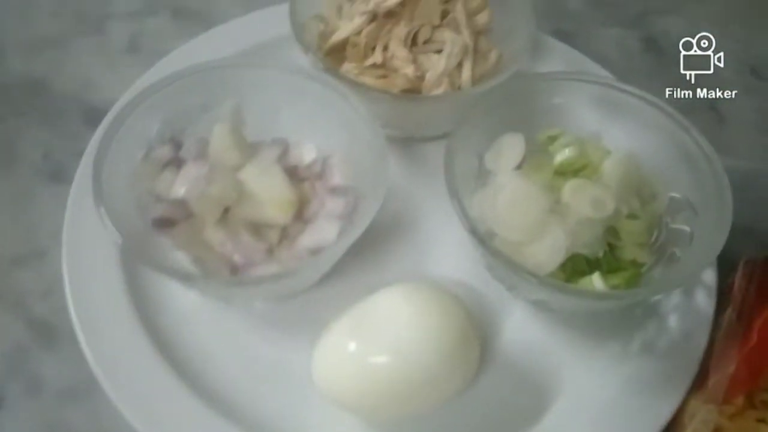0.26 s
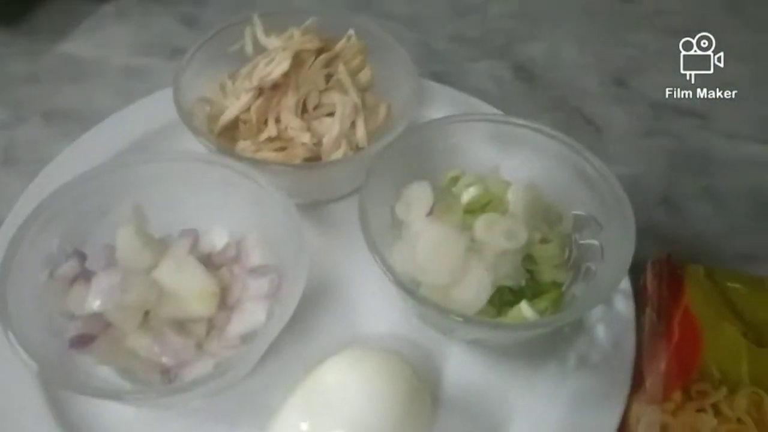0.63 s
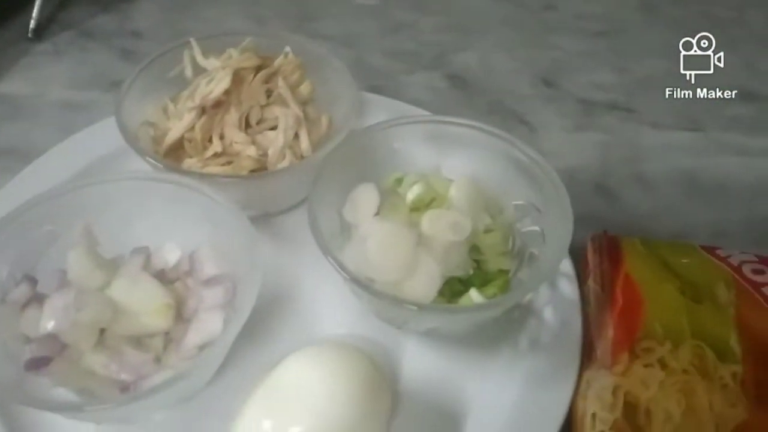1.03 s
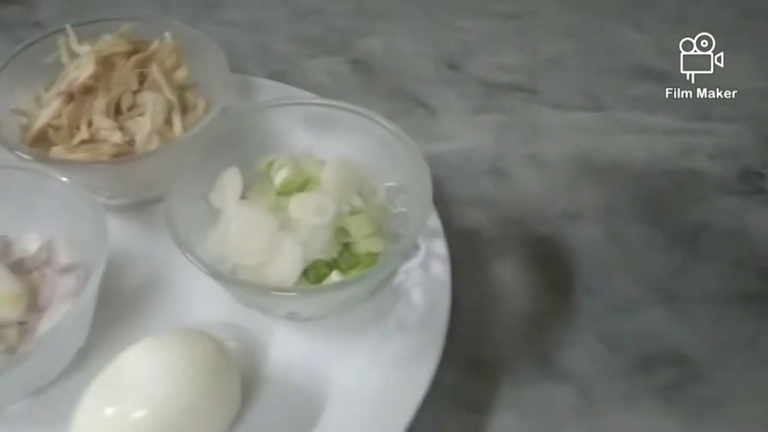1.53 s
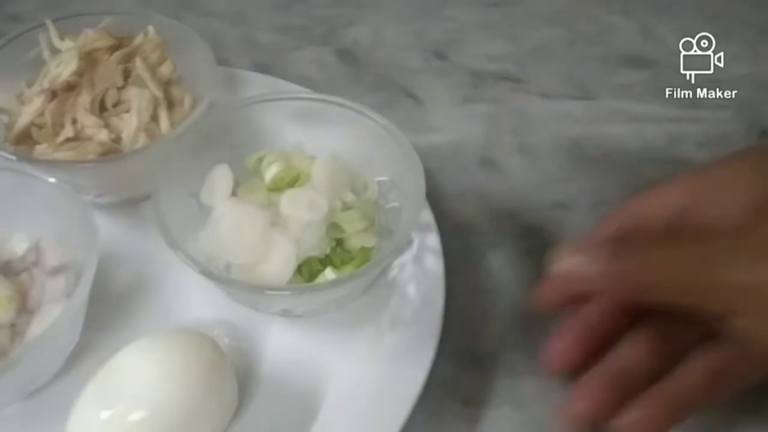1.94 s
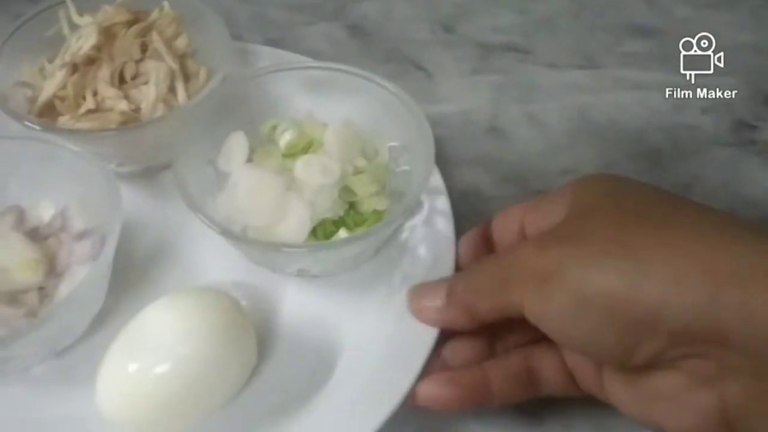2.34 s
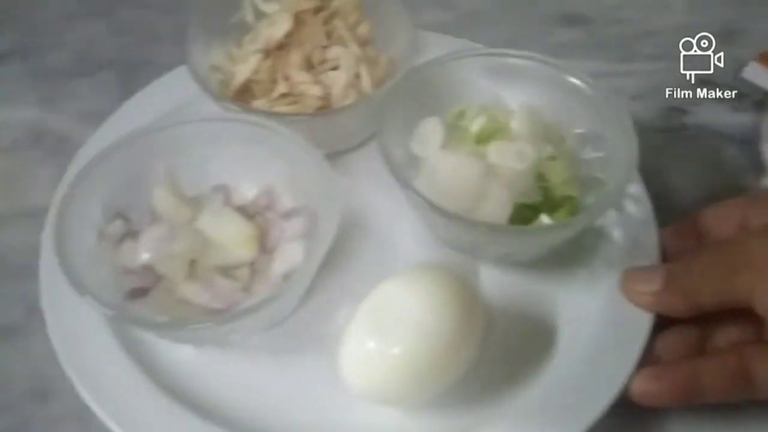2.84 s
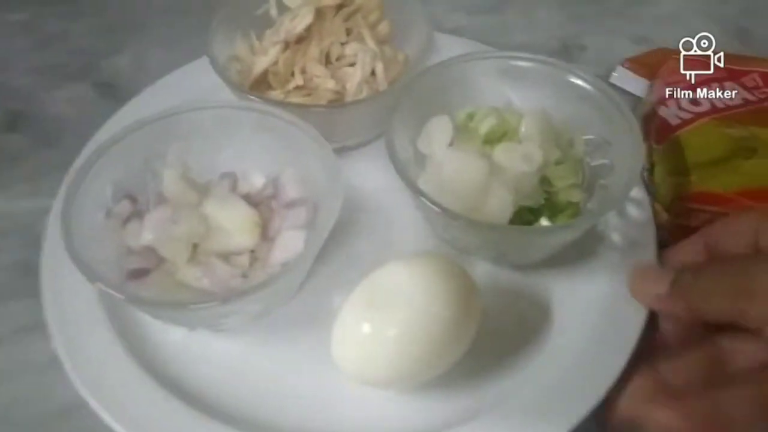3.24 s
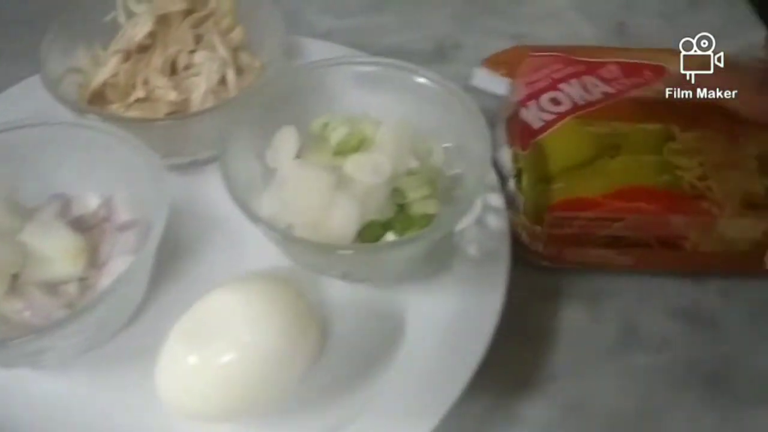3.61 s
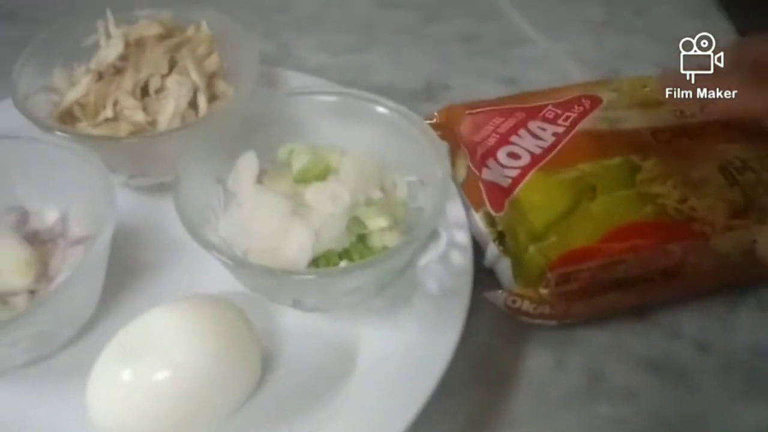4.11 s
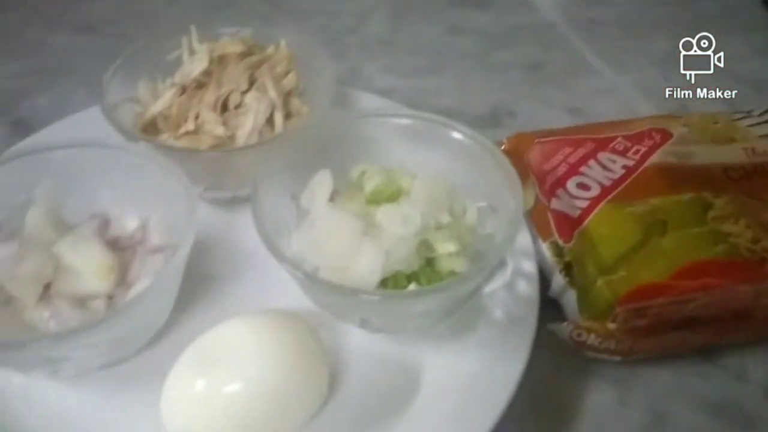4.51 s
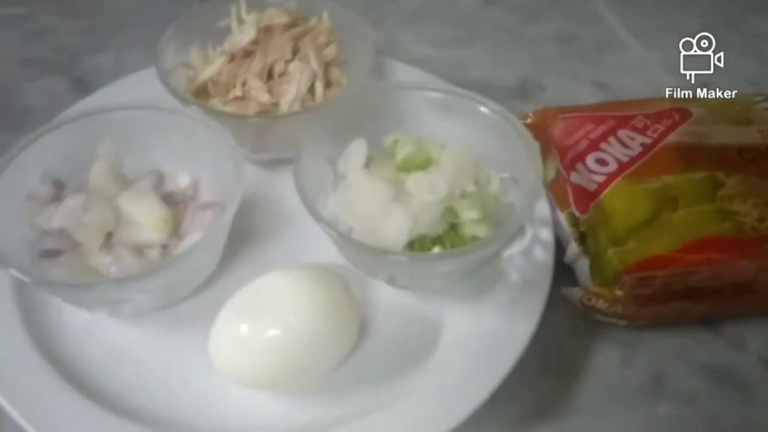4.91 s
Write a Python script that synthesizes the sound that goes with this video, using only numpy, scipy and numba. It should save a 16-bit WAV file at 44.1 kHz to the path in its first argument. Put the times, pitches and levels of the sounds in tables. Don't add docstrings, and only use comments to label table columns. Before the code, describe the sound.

In a hard-walled kitchen with a low fan hum, a plastic packet of dry noodles rustles and snaps, first briefly, then densely as it is lifted away. After a lull, a china plate slides across the stone counter with a ringing scrape. The packet returns with sharp crinkles, dull knocks and little buzzing jerks. A close phone microphone catches it all, with faint gas hiss at the end.

```python
import sys
import numpy as np
from scipy import signal
from scipy.fft import rfft, irfft
from scipy.io import wavfile
from scipy.ndimage import uniform_filter1d
from numba import njit

SR = 44100
rng = np.random.default_rng(int(sys.argv[2]) if len(sys.argv) > 2 else 0)


def dump(signal):
    limited = np.clip(np.atleast_2d(signal).T, -1, 1)
    pcm = np.round(limited * 32767).astype(np.int16)
    wavfile.write(sys.argv[1], SR, pcm)


def volts_from_db(level):
    exponent = np.asarray(level, float) / 20
    return 10 ** exponent


N = 227732


def level(x, db):
    return x * volts_from_db(db) / np.sqrt(np.mean(x ** 2))


def band(x, lo_hz, hi_hz, order=2):
    return signal.sosfilt(signal.butter(order, [lo_hz, min(hi_hz, .45 * SR)], "band", fs=SR, output="sos"), x)


def high_pass(x, hz):
    return signal.sosfilt(signal.butter(3, hz, "high", fs=SR, output="sos"), x)


def colour(x, table):
    hz, db = np.transpose(table)
    f = np.maximum(np.arange(N // 2 + 1) * SR / N, 1)
    return irfft(rfft(x) * volts_from_db(np.interp(np.log(f), np.log(hz), db)), N)


def ring(x, modes):
    out = 0
    for k, (f, width, db) in enumerate(modes):
        mode = signal.lfilter(*signal.iirpeak(f, f / max(width, 2), fs=SR), x)
        out = out + (-1) ** k * volts_from_db(db) * mode
    return out


def gains(spans):
    t, out = np.arange(N) / SR, 0
    for rows in spans:
        s, *cols = np.transpose(rows)
        fade = np.clip(np.minimum(t - s[0], s[-1] - t) / .02 + (s[0] <= 0), 0, 1)
        out = out + fade * volts_from_db(np.array([np.interp(t, s, c) for c in cols]))
    return out


def walk(rate):
    k = int(SR / rate)
    held = np.repeat(rng.standard_normal(N // k + 1), k)
    return 1.3 * uniform_filter1d(uniform_filter1d(held, k), k)[:N]


def crackle(rate, spread_db):
    hit, size, sign = rng.random((3, N))
    return (hit < rate / SR) * volts_from_db(-spread_db * np.log(size + .01)) * np.sign(sign - .5)


def fading(hits, tau_s):
    return signal.lfilter([1], [1, -np.exp(-1 / (tau_s * SR))], hits) * rng.standard_normal(N)


@njit
def grains(start, hz, t60, rise, size):
    out = np.zeros(N)
    for k in range(len(hz)):
        p, z = np.exp(2j * np.pi * hz[k] / SR - np.log(1000) / (t60 * SR)), size[k] + 0j
        for i in range(min(N - start[k], int(t60 * SR))):
            z *= p
            out[start[k] + i] += z.imag * (1 - np.exp(-i / (rise * SR)))
    return out


def hums(lines):
    out = 0
    for f, width, db in lines:
        once = ring(rng.standard_normal(N), [(f, width, 0)])
        twice = ring(once, [(f, width * 2, 0)])
        out = out + level(twice, db) * volts_from_db(1.45 * walk(2.05))
    return out


# frequency in Hz, density in dB per Hz.
FAN_AIR = [(18, -44), (30, -16.5), (194, -16.5), (221, -18.5), (287, -14), (473, -14.5), (526, -14),
           (684, -18), (1430, -22), (2480, -30.5), (7090, -37.5), (9220, -48), (16000, -46.5)]
# frequency in Hz, width in Hz, level in dB.
FAN_HUM = [(96.4, 10.6, -57.5), (193.7, 5.4, -59), (144.2, 14, -61.5), (333.6, 29, -63.5),
           (118.8, 13.3, -59), (282.2, 14, -68)]
# frequency in Hz, width in Hz, level in dB.
FLAME_WHISTLE = [(9150, 250, -75.5), (12200, 120, -89), (11760, 100, -82), (4960, 270, -81.5),
                 (10800, 870, -78.5)]
# time in seconds, level in dB.
FLAME_SWELL = [
    (0, -3),
    (.9, 0),
    (2.1, -3.5),
    (3.5, 2),
    (4.4, 1),
    (4.7, 3.5),
    (5.2, 5.5),
]


def kitchen():
    air = level(colour(rng.standard_normal(N), FAN_AIR), -52) * volts_from_db(0.22 * walk(2.2))
    return air + hums(FAN_HUM) + gains([FLAME_SWELL])[0] * hums(FLAME_WHISTLE)


# frequency in Hz, density in dB per Hz.
FILM_TONE = [(150, 17), (250, 6), (700, -1), (1300, 1.5), (2500, 7.5), (5000, 14), (7800, 1), (9900, 0.5),
             (11500, -1.5), (13000, -14), (16000, -6.5)]
# time in seconds, crumpling in dB, tautness in dB (taut is brighter).
GRIP_ON_FILM = [
    [(0.0, -42.5, 1.5), (0.098, -60.5, -4), (0.11, -51, 13), (0.22, -53.5, -6), (0.3, -55.5, -6),
     (0.45, -67.5, 0), (0.68, -65, -1), (0.87, -52.5, 0), (0.96, -56, 0)],
    [(0.94, -48, -5), (1.0, -43, -1), (1.2, -39.5, -3.5), (1.35, -38.5, 4.5), (1.47, -37.5, 6),
     (1.58, -38, 8.5), (1.73, -43, -4), (1.9, -57.5, -12), (2.25, -74, -17.5)],
    [(3.636, -54, -8), (3.665, -30.5, 2.5), (3.7, -39.5, 0), (3.78, -36, -0.5), (3.92, -49, 5),
     (4.06, -43.5, -5), (4.19, -46, 2.5), (4.28, -54, -6.5), (4.45, -51, -6)],
]


def rustle():
    film = colour(crackle(4200, 3.6) * volts_from_db(1.6 * walk(35)), FILM_TONE)
    grip = [[(s, db - taut + 1.5, db + 3, db + taut - 4.5) for s, db, taut in rows] for rows in GRIP_ON_FILM]
    out = 0
    for gain, (lo_hz, hi_hz) in zip(gains(grip), [(250, 2500), (2500, 7000), (7000, 16500)]):
        flicker = volts_from_db(1.8 * walk(60))
        out = out + gain * flicker * level(band(film, lo_hz, hi_hz, order=3), -4)
    return out


# time in
# seconds, # dull ring in dB, low patch in Hz, crack in dB, high patch in Hz.
CREASES = [(0.1046, -24, 2300, -16.5, 6200), (0.1097, -38, 1360, -48, 3930),
           (0.2332, -35.5, 1050, -52, 3640), (0.259, -34, 2400, -47, 3610),
           (0.278, -25.5, 1470, -45, 4050), (0.3014, -25.5, 1440, -37.5, 4070),
           (0.408, -53, 1670, -48.5, 4010), (0.5026, -58, 1780, -49, 3610),
           (0.558, -29, 1680, -31, 7300), (0.5623, -21.5, 1910, -34, 9900),
           (0.5647, -26, 2070, -56, 10140),
           (0.9501, -27.5, 1380, -28, 9550), (0.988, -28, 2140, -32, 3610),
                (1.01, -28, 3020, -34, 4120), (1.017, -29, 2040, -27.5, 10400),
                (1.0212, -32, 1430, -27, 4400), (1.0561, -30, 1370, -14, 10400),
                (1.071, -25, 1570, -27, 9700), (1.083, -45, 1500, -36, 9160),
                (1.1201, -24.5, 1120, -18.5, 5200), (1.125, -31, 1410, -28, 10200),
                (1.1319, -23.5, 1340, -29, 4680), (1.1566, -22, 1400, -19, 10000),
                (1.1617, -23, 1380, -20, 10100), (1.1735, -32, 1300, -17.5, 4900),
                (1.1893, -20.5, 1500, -33, 5220), (1.237, -29, 1520, -32, 3920),
                (1.249, -33, 2000, -24, 6560), (1.2627, -33, 1360, -25, 9800),
                (1.2693, -28, 1480, -16.5, 9900), (1.2774, -27, 1500, -21, 3540),
                (1.2921, -27, 1600, -13, 4170), (1.301, -30, 1390, -41, 4150), (1.313, -27, 900, -40, 4480),
                (1.3581, -23, 2050, -16.5, 5240),
           (1.4252, -40, 2010, -31, 9920), (1.476, -34, 3100, -31, 4510),
                 (1.5044, -32, 1120, -28.5, 9700), (1.544, -38, 3110, -28, 4550),
                 (1.59, -37, 2840, -32, 10000), (1.667, -28.5, 980, -26, 2620),
                 (1.709, -29, 1900, -34, 5380), (1.738, -26, 1250, -39, 3840),
                 (1.7428, -26, 1310, -31.5, 3580), (1.76, -19, 2390, -29, 3910),
                 (1.771, -21.5, 2270, -24.5, 4930), (1.774, -37, 2330, -37, 10600),
                 (1.8162, -36, 1480, -31, 6950), (1.851, -43, 2470, -40, 7500),
                 (1.891, -41, 1500, -36, 5500), (1.9573, -33, 1080, -51.5, 3640),
                 (2.355, -43, 2020, -51, 5570), (2.392, -56, 1100, -67, 3710),
                 (2.4, -34.5, 2230, -60, 4810), (2.408, -39, 1430, -62, 4690),
                 (3.168, -25, 1910, -25, 3900),
           (3.6546, -28, 1180, -27, 4060), (3.668, -26, 1100, -25, 4200),
                    (3.6723, -29, 3000, -19, 4650), (3.722, -28, 2030, -32, 4550),
                    (3.73, -33, 2100, -24, 10400), (3.7345, -27, 1300, -25, 4050),
                    (3.7559, -25, 1240, -21.5, 10100), (3.7756, -23, 1890, -35, 4220),
                    (3.7817, -26, 1950, -20, 3950), (3.814, -41, 1800, -35, 4220),
                    (3.8281, -29, 1430, -35, 9500), (3.852, -50, 1930, -36, 8000),
                    (3.882, -40, 1130, -36, 4030), (3.8901, -20, 1890, -24, 3480),
                    (3.954, -37, 2720, -43, 3610), (3.966, -29, 1940, -46, 3630),
                    (3.9857, -22, 1280, -44, 5770), (4.034, -33, 1980, -45, 5240),
                    (4.0689, -28, 1310, -31, 3610), (4.0823, -17, 1290, -16, 4050),
                    (4.186, -38, 1850, -33, 9280), (4.2657, -34, 1900, -41, 4260),
                    (4.2846, -35, 1210, -32, 3920), (4.4932, -47, 2700, -57, 4310),
           (0.117, -31, 1390, -42, 2400), (0.129, -41, 1360, -50, 3600),
                 (0.9527, -29.5, 1100, -28.5, 7100), (0.973, -47, 1500, -34, 5000),
                 (0.992, -27, 1190, -42, 3600), (0.999, -31, 1250, -44, 3600),
                 (1.0265, -27, 1250, -27, 8000), (1.047, -44, 1250, -36, 3600),
                 (1.064, -38, 1300, -40, 4000), (1.068, -25, 1390, -35, 4000),
                 (1.082, -37, 1300, -29, 3600), (1.091, -41, 1300, -38, 3600),
                 (1.0995, -30, 1500, -36, 3600), (1.141, -38, 1420, -44, 3600),
                 (1.167, -25, 1600, -34, 4000), (1.193, -35, 1300, -31, 3600), (1.21, -28, 1700, -35, 3500),
                 (1.214, -30, 1210, -28, 5000), (1.229, -32, 1300, -34, 3600),
                 (1.242, -36, 1360, -41, 3600), (1.257, -24, 2100, -29, 4500),
                 (1.273, -37, 1150, -41, 3600), (1.2942, -16, 2800, -26, 3500),
                 (1.307, -27, 2930, -26, 3600), (1.367, -30, 2020, -39, 3570), (1.398, -28, 990, -39, 3600),
                 (3.727, -29, 1290, -24, 4000), (3.768, -28, 1300, -31, 3600),
                 (3.934, -30, 1290, -36, 3600), (3.973, -37, 2600, -40, 4200), (4.043, -35, 990, -46, 3600),
                 (4.06, -29, 1560, -38, 3600), (4.0887, -31, 1900, -31, 4200),
                 (4.094, -28, 1700, -44, 3600), (4.105, -33, 2700, -45, 3600),
                 (4.172, -30, 1850, -46, 3600)]
# t60 in seconds, spread in octaves, boost in dB, rise in seconds.
FILM_PATCHES = [
    (0.013, 0.11, 5.5, 0.000054),
    (0.0034, 0.23, 7, 0.000029),
]


def snaps():
    creases = CREASES
    s, dull_db, low_hz, bright_db, high_hz = np.array(creases).T[:, :, None]
    crack = np.zeros(N)
    crack[(s[:, 0] * SR).astype(int)] = volts_from_db(bright_db[:, 0] + 11)
    tear = volts_from_db(-6) * fading(crack, .0012) + volts_from_db(-16) * fading(crack, .009)
    out = band(volts_from_db(-2) * np.diff(crack, prepend=0) + tear, 770, 6630)
    count, scatter_s, follow_db = 4, .0008, -3
    order = np.arange(count)
    patches = (low_hz, dull_db - 5), (high_hz, bright_db - 2)
    for (centre_hz, db), (t60, octaves, boost_db, rise) in zip(patches, FILM_PATCHES):
        detune, lag = rng.uniform(-1, 1, (2, len(s), count))
        hz = np.minimum(centre_hz * 2 ** (octaves * detune * order), .27 * SR)
        start = ((s + scatter_s * abs(lag) * order) * SR).astype(np.int64)
        size = volts_from_db(db + boost_db + follow_db * order)
        out = out + grains(start.ravel(), hz.ravel(), t60, rise, size.ravel())
    return high_pass(out, 700)


# time
# in seconds, level in dB, frequency in Hz.
SHARP_POPS = [(0.1047, -3.5, 2920), (0.952, -29, 5030), (0.9882, -25, 3000), (1.0558, 0.6, 7400),
              (1.176, -16, 4950), (1.189, -8, 2560), (1.2928, -10, 4270), (1.358, -4.5, 3000),
              (2.9375, -15, 2400), (2.858, -24, 7000), (1.2497, -20, 2400), (1.1567, -16, 2600),
              (3.655, -23, 4500), (3.671, -13, 5000), (3.889, -21, 3000), (4.0826, -9, 3600),
              (4.265, -33, 2600)]


def pops():
    s, db, hz = np.transpose(SHARP_POPS)
    cycles = grains((s * SR).astype(np.int64), hz, .0017, 1 / SR, volts_from_db(db + 2))
    return band(cycles, 1640, 17300)


# time in seconds, level in dB, frequency in Hz.
BLOCK_KNOCKS = [(0.279, -59, 500), (1.004, -37, 350), (1.027, -40, 470), (1.187, -37, 700),
                (1.27, -34.5, 425), (1.297, -34, 495), (1.357, -54, 453), (2.31, -47, 350),
                (2.398, -39, 430), (2.405, -49, 477), (2.44, -46, 400), (3.653, -46, 320), (3.67, -38, 605),
                (3.734, -34.5, 730), (3.78, -39.5, 477), (3.893, -34.5, 784), (3.9, -43, 338),
                (3.951, -36.5, 610), (4.082, -37, 490), (4.103, -45, 800), (4.285, -46, 506)]


def knocks():
    s, db, hz = np.transpose(BLOCK_KNOCKS)
    t60_s, rise_s = .013, .00049
    return grains((s * SR).astype(np.int64), hz, t60_s, rise_s, volts_from_db(db + 9.5))


# time in #
# seconds, level in dB, frequency in Hz.
SLACK_FOLDS = [(0.3044, -33, 1210), (1.0857, -27, 1400), (1.139, -26, 1500), (1.2787, -14, 2000),
               (1.4104, -33, 2410), (1.481, -28, 1450), (1.494, -31, 2500), (1.518, -29, 1060),
               (1.5387, -37, 2500), (1.593, -33, 2500), (1.7017, -31, 1010), (1.72, -34, 1950),
               (1.7431, -30, 1360), (1.7524, -32, 5500), (1.757, -33, 5000), (1.826, -33, 2530),
               (2.4066, -40, 1380), (3.648, -34, 1230), (3.667, -26, 1600), (3.6701, -20, 1300),
               (3.6796, -33, 2000), (3.7638, -27, 1090), (3.7713, -25, 1950), (3.923, -30, 1220),
               (3.9869, -17, 1270), (3.992, -26, 2120), (4.0155, -32, 2060), (4.032, -25, 1990),
               (4.16, -29, 1820), (4.198, -32, 2180), (4.383, -33, 2010), (4.4293, -32, 1950),
               (4.433, -27, 1850), (1.6367, -33, 5000)]


def gives():
    s, db, hz = np.transpose(SLACK_FOLDS)
    t60_s, rise_s = .007, .00028
    return grains((s * SR).astype(np.int64), hz, t60_s, rise_s, volts_from_db(db + 2))


# frequency in Hz, width in Hz, level in dB.
AIR_POCKET = [(1390, 200, 5), (1500, 300, -11)]
# time in seconds, level in dB.
HAND_SQUEEZE = [
    (0.945, -39),
    (0.985, -48),
    (1.0, -34),
    (1.05, -46),
    (1.058, -33),
    (1.098, -40.5),
    (1.11, -54),
    (1.2, -45),
    (1.3, -38.5),
    (1.4, -49),
]


def pouch():
    return gains([HAND_SQUEEZE])[0] * level(ring(crackle(900, 3), AIR_POCKET), 0)


def stone_grit():
    return crackle(5000, 2.5) * volts_from_db(walk(50))


# time in seconds, level in dB.
LAY_ASIDE = [
    (1.8, -38),
    (1.9, -37),
    (2.2, -63),
]
# frequency in Hz, width in Hz, level in dB.
RESTING_PLACE = [(2390, 160, 0), (2600, 200, -4), (3050, 400, -4), (3670, 150, -9)]


def settle():
    return gains([LAY_ASIDE])[0] * level(ring(stone_grit(), RESTING_PLACE), -7)


# time in seconds, speed as a level in dB, weight on the counter in dB.
PLATE_SLIDE = [
    (2.28, -61, -6),
    (2.43, -52, 3),
    (2.518, -30, 3),
    (2.61, -24.5, 0),
    (2.872, -22, -3),
    (3.176, -24, 0.5),
    (3.338, -30, 3),
    (3.35, -47, 15),
    (3.6, -64, 14.5),
]
# time in seconds, level in dB, squeak against it in dB.
PLATE_LURCHES = [
    (2.312, -66, 9),
    (2.345, -62, -1),
    (2.393, -46, -27),
]
# time in seconds, surge in dB.
GRIT_SURGES = [
    (2.6, 1.5),
    (2.711, 5.5),
    (2.83, 2.5),
    (2.877, 7),
    (2.937, 0.5),
    (3.083, 5),
    (3.165, -1.5),
    (3.255, 5),
]
# frequency in Hz, width in Hz, level in dB.
CHINA_MODES = [(403, 42, -19), (475, 11.7, -10), (634, 58, -15.5), (730, 50, -14.5), (1150, 250, -14),
               (1470, 25, 9), (1680, 370, -7), (1890, 53, -1), (2020, 280, -0.5), (2140, 20, 13),
               (2230, 250, -3.5), (3318, 92, 9.5), (3870, 130, -1.5), (4730, 110, -3.5), (5570, 39, 0),
               (6200, 130, -7), (6400, 59, -25), (7010, 45, -44), (7400, 61, -8), (8370, 83, -3),
               (10100, 110, -30), (10200, 290, -12.5), (10250, 48, -12), (11300, 61, -13), (12350, 60, -37),
               (12700, 130, -39), (13200, 40, -41), (13450, 60, -24), (14450, 98, -22), (1509, 41, 8),
               (1700, 21, -4), (1967, 29, 8.5), (2173, 38, 0.5)]
# frequency in Hz, density in dB per Hz.
SCRAPE_TONE = [(150, -45), (250, -19.5), (460, -28), (988, -10), (1640, 9), (2910, -2.5), (3340, -14),
               (4260, -40), (5730, 3), (6820, -12), (10400, -21), (14700, -40), (16000, -51)]
# time in seconds, level in dB.
PLATE_GROAN = [
    (2.84, -68),
    (2.9, -50),
    (3.05, -47.5),
    (3.13, -41.5),
    (3.19, -46),
    (3.28, -69),
]
# frequency in Hz, width in Hz, level in dB.
GROAN_MODES = [(405, 32, -5.5), (485, 35, -3)]


def plate():
    t = np.arange(N) / SR
    s, db, weight = np.transpose(PLATE_SLIDE)
    rumble_db = db - 10 + weight
    treble_db = db - 10.5 - 0.59 * weight + 0.15 * np.maximum(db - max(db), -12)
    motion = gains([np.transpose([s, rumble_db, db, treble_db])])
    for at, lurch_db, squeak in PLATE_LURCHES:
        bands_db = np.array([[lurch_db + 7], [lurch_db], [lurch_db + squeak]])
        motion = motion + (t > at) * volts_from_db(bands_db - 454 * abs(t - at))
    surge_db = sum((t > at) * rise_db * np.exp(-abs(t - at) / .017) for at, rise_db in GRIT_SURGES)
    grit = crackle(7000, 3) * volts_from_db(walk(70)) * volts_from_db(surge_db)
    china = sum((-1) ** k * volts_from_db(1.5 * walk(14)) * ring(grit, [mode]) for k, mode in enumerate(CHINA_MODES))
    body = level(china, 0) + level(colour(grit, SCRAPE_TONE), -6.5)
    out = gains([PLATE_GROAN])[0] * level(ring(grit, GROAN_MODES), 0)
    bands = (200, 900, -2), (900, 4350, -2.5), (4350, 16500, -2)
    for gain, (lo_hz, hi_hz, part_db) in zip(motion, bands):
        out = out + gain * level(band(body, lo_hz, hi_hz, order=3), part_db)
    return out


# time in seconds, hold in seconds, level in dB, lean to near edge in dB.
DRAG_JERKS = [(3.948, 0.0071, -43, -2), (3.971, 0.02, -34.5, 3.5), (3.995, 0.02, -45, 0),
              (4.021, 0.015, -40.5, 2), (4.064, 0.019, -37, 7), (4.103, 0.017, -40.5, -1),
              (4.129, 0.028, -41.5, 6), (4.166, 0.023, -39, 1.5), (4.191, 0.035, -46, 6.5),
              (4.268, 0.01, -44.5, 6), (4.313, 0.012, -51.5, 7.5), (4.343, 0.021, -46.5, -1),
              (4.386, 0.02, -40.5, 4.5), (4.429, 0.015, -39, 3), (4.486, 0.024, -46, 3.5)]
# frequency in Hz, width in Hz, level in dB, share of the lean (-1, 0 or 1).
BLOCK_MODES = [(836, 69, 3, 0), (1290, 81, -4, 0), (1810, 140, 7, 0), (2116, 72, 5.5, 1),
               (2654, 88, 10.5, -1), (3000, 35, -15, 0), (4050, 110, -11, 0), (5200, 90, -22, 0),
               (6100, 180, -12, 0)]


def drag():
    t = np.arange(N) / SR
    leaning = {-1: 0, 0: 0, 1: 0}
    for s, hold, db, lean in DRAG_JERKS:
        rise_db = 900 * np.maximum(s - t, 0)
        fall_db = 1100 * np.maximum(t - s - hold, 0)
        jerk = volts_from_db(db - rise_db - fall_db)
        for share in leaning:
            leaning[share] = leaning[share] + jerk * volts_from_db(share * lean)
    grit = stone_grit()
    grit = grit / np.std(ring(grit, [mode[:3] for mode in BLOCK_MODES]))
    buzz = 0
    for f, width, db, share in BLOCK_MODES:
        buzz = buzz + leaning[int(share)] * volts_from_db(walk(40)) * ring(grit, [(f, width, db)])
    return buzz


# low edge in Hz, high edge in Hz, t60 in seconds, level in dB.
ROOM_TAIL = [(300, 997, 0.21, -14.5), (1500, 3900, 0.53, -19.5), (3000, 7600, 0.6, -16),
             (6060, 29000, 0.47, -12)]


def room(x):
    t = np.arange(SR // 2) / SR
    tail = 0
    for lo_hz, hi_hz, t60, db in ROOM_TAIL:
        noise = level(band(rng.standard_normal(len(t)), lo_hz, hi_hz), db)
        tail = tail + noise * np.sqrt(2 * np.log(1000) / t60 / SR) * 1000 ** (-t / t60)
    return signal.fftconvolve(x, tail * np.clip(t / 0.00042, 0, 1))[:N]


def scene():
    background = kitchen()
    near = rustle() + snaps() + pops() + knocks() + gives() + pouch() + plate()
    dragged = settle() + drag()
    return (near + dragged + room(near + volts_from_db(-7.5) * dragged) + background)[None]


def band_limit(x):
    return signal.sosfilt(signal.butter(12, 16810, fs=SR, output="sos"), x)


# frequency in Hz, gain in dB.
MIC_RESPONSE = [(20, -42), (45, 5.5), (90, 4), (8000, -3), (10000, 6.5), (12500, 0), (16000, 1)]


def record(dry):
    mic = colour(dry[0], MIC_RESPONSE)[None]
    cut = signal.sosfilt(signal.ellip(10, .2, 45, 15750, fs=SR, output="sos"), mic)
    return band_limit(cut)


dry = scene()
out = record(dry)
dump(out)
```